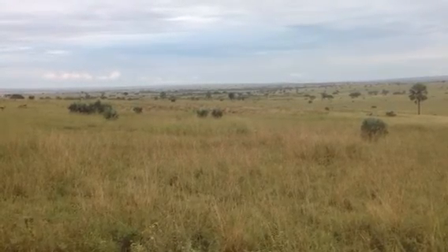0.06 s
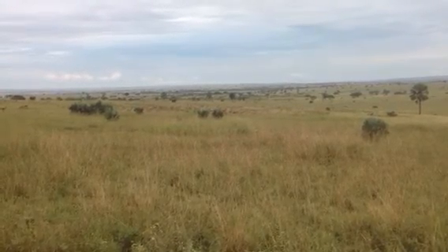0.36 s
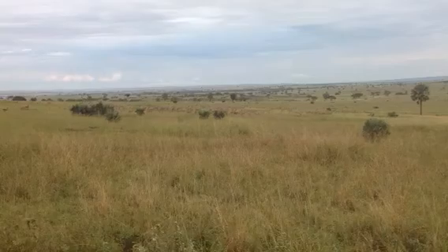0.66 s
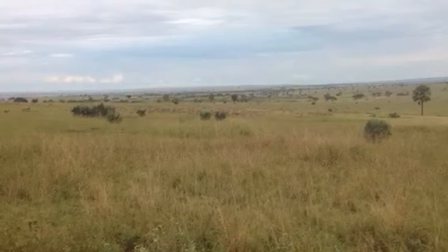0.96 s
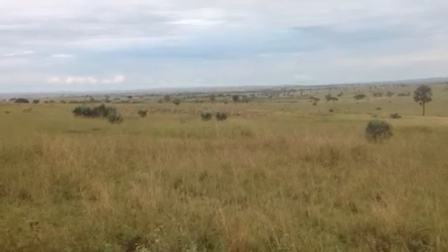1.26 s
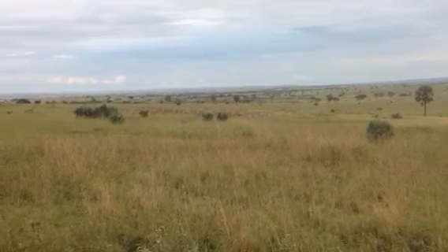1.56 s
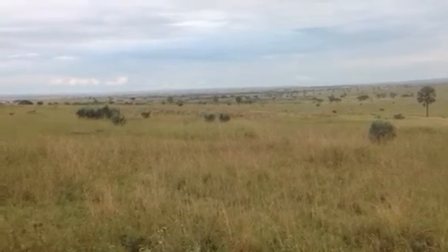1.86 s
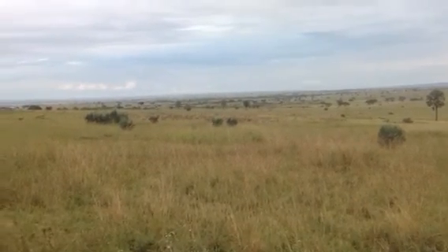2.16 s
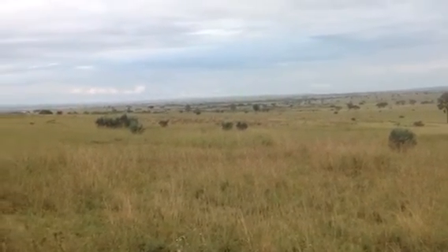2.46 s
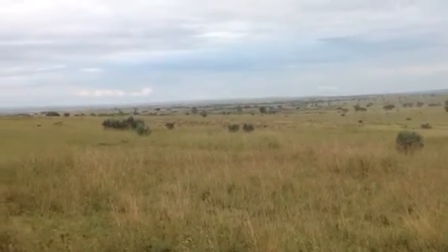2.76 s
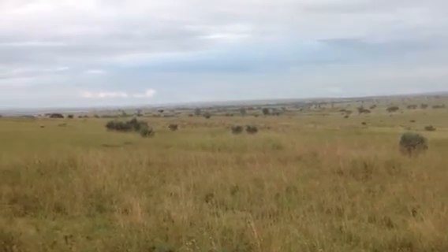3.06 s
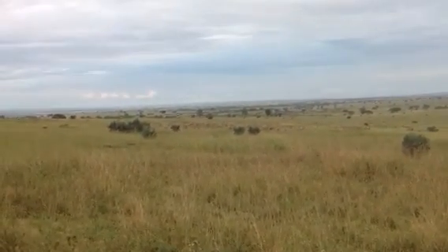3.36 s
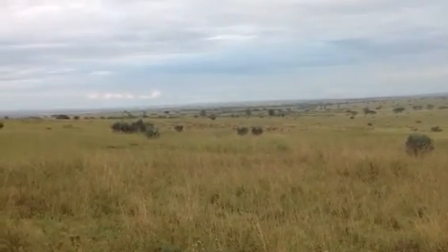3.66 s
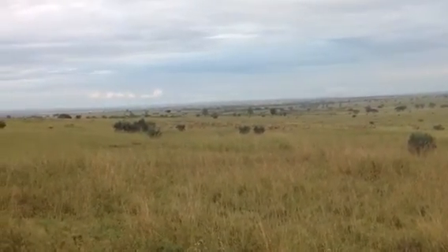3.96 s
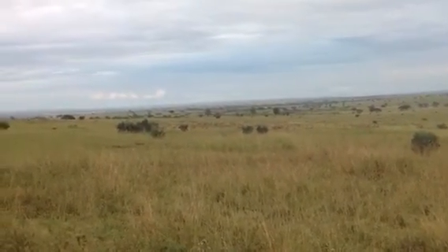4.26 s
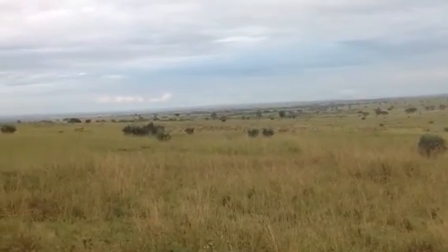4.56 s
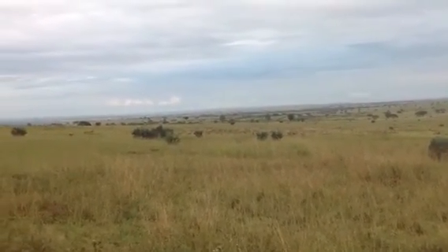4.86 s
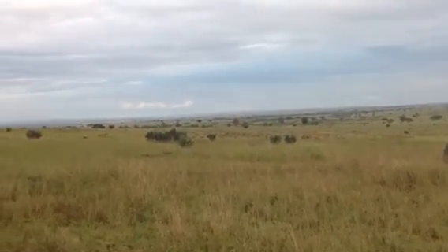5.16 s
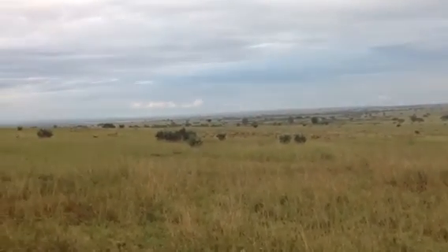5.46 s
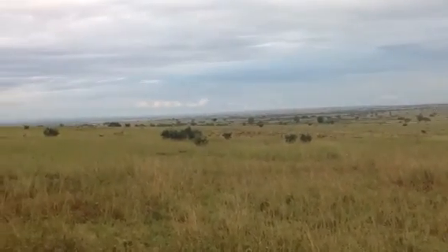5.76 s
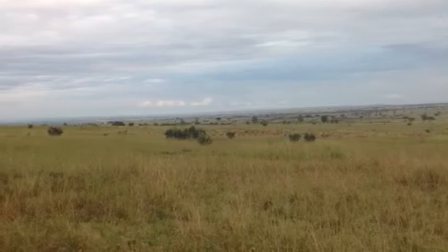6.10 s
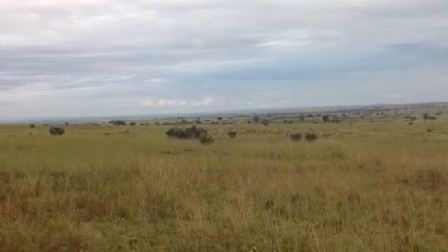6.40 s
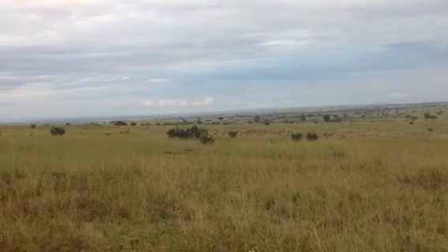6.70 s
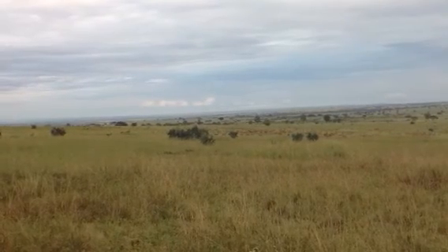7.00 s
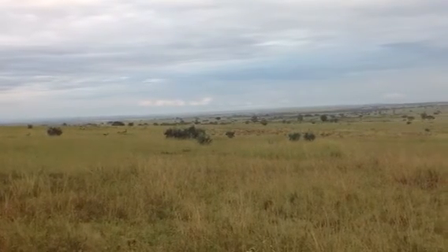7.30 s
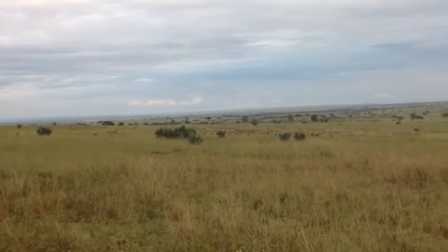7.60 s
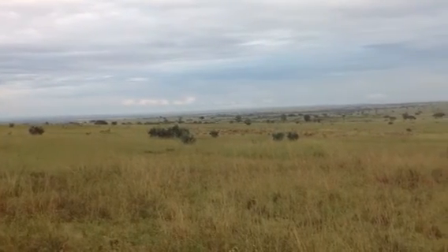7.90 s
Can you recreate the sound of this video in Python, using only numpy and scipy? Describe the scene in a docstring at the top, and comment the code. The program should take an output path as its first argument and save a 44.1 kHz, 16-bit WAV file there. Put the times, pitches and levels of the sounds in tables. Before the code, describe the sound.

Crickets chirp throughout in open grassland, with higher and lower ticks, trills and rasps over a soft, shimmering distant chorus. One close cricket stands out with a high chirr, pulsing about two and a half times a second: twice in the first second, then from about 2.2 to 4.7 seconds, and again from 6.4 to 7.7 seconds. A brief puff of wind bumps the hand-held microphone at the start, followed by two tiny bird peeps. A quick cluster of dry handling clicks and light knocks comes around 1.7 seconds. Gusts buffet the microphone from 2 to 2.8 seconds, with the hardest low thump at 2.5. Weaker puffs follow near 3.3 and 5 seconds. Far birds whistle very faintly between 3.6 and 7.4 seconds. From about 7.5 seconds the wind rumbles and thumps again until the end, just after 8 seconds.

```python
"""Crickets in open grassland

One cricket chirrs close by, a few farther off, with higher and lower kinds over a distant chorus.
Each chirp is a train of wing strokes, each stroke a short tone that falls as the scraper slows.
Far birds whistle, and gusts buffet and thump a hand-held camera's microphone.
There are a few dry clicks and dull knocks, some from handling the camera."""
import sys
import numpy as np
from scipy import signal
from scipy.fft import rfft, irfft, next_fast_len
from scipy.io import wavfile
from scipy.ndimage import uniform_filter1d, map_coordinates

SR = 44100
rng = np.random.default_rng(int(sys.argv[2]) if len(sys.argv) > 2 else 0)


def master_out(mix):
    """Clip the mix to full scale and print it as 16-bit PCM to the path in sys.argv[1]."""
    frames = np.transpose(np.atleast_2d(mix))
    ceiling = np.clip(frames, -1, 1)
    pcm = np.round(ceiling * 32767).astype(np.int16)
    wavfile.write(sys.argv[1], SR, pcm)


N = 358974
TIME = np.arange(N) / SR

# Spectra. Each row: frequency in Hz, relative level in dB.
AIR_SPECTRUM = [(20, -16), (50, -2.5), (80, -8.5), (160, 5), (300, 3), (600, -1), (1500, -3.5), (3300, -4),
                (9500, -6), (15000, -8)]  # the steady background
CHORUS_SPECTRUM = [(3000, -59), (3700, -16), (4150, -6), (4550, -14.5), (5100, -3), (5800, -0.5),
                   (6300, -1.5), (6850, -10), (7400, -6), (8100, -10), (8700, -15), (9500, -73)]  # many far insects merged
CLICK_SPECTRUM = [(300, -44), (900, -14), (1400, -7), (2200, -17), (3700, 3.5), (6000, -11), (9000, -7.5),
                  (15000, -18)]  # a sharp, dry click
KNOCK_SPECTRUM = [(200, -13), (550, 2), (1050, 1.5), (1370, 4), (1700, -2.5), (2300, 2.5), (3700, -4.5),
                  (6000, -30)]  # a dull knock
BUFFET_SPECTRUM = [(20, -16), (45, -8), (75, -5), (105, 1.5), (170, 1.5), (260, -8), (400, -26),
                   (600, -37.5), (1000, -62), (2500, -93)]  # coarse turbulence at the microphone
EDDY_SPECTRUM = [(120, -48), (260, -5), (400, 0), (550, -9.5), (750, -18), (1100, -35), (2500, -80)]  # fine turbulence of hard gusts
WING_RESONANCES = [(4800, 0), (5300, 2.5), (5620, 2), (5830, -7), (6070, 4), (6400, -2), (6900, 2),
                   (11000, 0)]  # the near cricket's wings

# Bird glides. Each row: start and length in seconds, first, middle and last pitch in Hz, level in dB.
BIRD_GLIDES = [(3.602, 0.3, 2250, 2300, 2400, -70.5), (3.831, 0.13, 2350, 2650, 2390, -62),
               (4.85, .09, 2800, 2830, 2950, -71), (5.087, .1, 2630, 2660, 3050, -69),
               (5.57, 0.34, 2720, 2206, 2316, -67.5), (6.08, .11, 2600, 2770, 3010, -65.5),
               (6.24, 0.14, 2950, 2780, 2600, -69.5), (6.52, .3, 2740, 2084, 1777, -65),
               (7.0, .16, 3620, 3450, 2900, -70.5), (7.118, 0.24, 1640, 1640, 1523, -70)]
# Bird notes that flick upward. Each row: start in seconds, held pitch in Hz, level in dB.
BIRD_FLICKS = [(4.215, 2480, -65), (4.338, 2430, -62.5), (4.462, 2410, -64.5), (4.592, 2480, -66)]
# Two clear, even peeps. Each row: start and length in seconds, pitch in Hz, level in dB.
BIRD_PEEPS = [(0.322, 0.036, 3970, -50), (0.383, 0.039, 3960, -50.5)]
# Dry clicks and dull knocks, some from handling the camera.
# Each row: start in seconds, click level in dB, knock level in dB.
DRY_CLICKS = [(1.628, -60, -57), (1.647, -41, -56.5), (1.656, -56, -72), (1.687, -43, -54),
              (1.716, -66, -62), (1.737, -46, -64), (1.743, -49.5, -62), (2.23, -53, -65),
              (2.951, -62, -61), (3.435, -55.5, -68), (4.744, -67, -51), (5.074, -65, -65)]

# The light breeze between gusts. Each row: time in seconds, level in dB.
BREEZE_LEVELS = [(0, -82.5), (2.3, -79), (3.2, -69.5), (3.55, -63), (4.3, -68.5), (5.05, -55.5),
                 (5.75, -73.5), (6.25, -76), (6.75, -61.5), (7.0, -71.5), (7.5, -61.5), (8.1, -50.5)]
# Gusts. Each row: arrival at full strength in seconds, hold in seconds, level in dB.
WIND_GUSTS = [(0.034, 0.11, -54.5), (1.178, .01, -61), (2.024, 0.015, -36), (2.491, 0.097, -33.5),
              (2.608, 0.095, -38.5), (2.72, 0.026, -43.5), (2.815, .015, -55), (3.314, 0.029, -53),
              (3.443, 0.12, -53.5), (3.681, 0.013, -48.5), (4.029, 0.079, -59.5), (4.529, 0.035, -54),
              (4.958, 0.1, -48.5), (5.359, 0.097, -56.5), (6.621, .03, -55), (6.75, 0.097, -60),
              (7.19, 0.054, -58), (7.399, 0.014, -47.5), (7.58, 0.081, -40), (7.712, 0.039, -38),
              (7.775, 0.056, -43), (7.872, 0.064, -34), (8.074, 0.039, -36)]
# Hard pushes of air on the microphone. Each row: time in seconds, level in dB.
HARD_PUSHES = [(.0409, -29.5), (.148, -39), (2.0262, -27), (2.329, -36.5), (2.4954, -15), (2.5316, -21),
               (2.7003, -23.5), (3.324, -37.5), (4.998, -33.5), (7.6266, -27), (7.7125, -25),
               (7.8875, -23.5), (7.9136, -18), (8.1049, -22.5)]

# Calls of three insects. Each row: last stroke in seconds, level in dB, number of strokes.
TICK_RUNS = [(.433, -57, 5), (1.12, -57, 1), (1.492, -57, 4), (2.029, -62.5, 3), (2.838, -56, 7),
             (3.866, -58, 6), (4.3, -62.5, 3), (4.899, -56.5, 6), (6.284, -57.5, 7), (7.636, -57, 7)]  # slow, low ticks
TRILL_SPELLS = [(.6, -60, 12), (2.0, -63, 19), (3.27, -60.5, 12), (4.7, -67, 17), (5.54, -59.5, 12),
                (6.83, -65, 14), (8.1, -68, 15)]  # an even, low trill
RASP_RUNS = [(1.52, -55, 3), (2.98, -52, 4), (3.37, -49.5, 2), (4.435, -55.5, 3), (5.68, -52.5, 4),
             (5.825, -51, 2), (5.945, -55, 2), (7.38, -53.5, 1), (7.892, -57, 2), (8.028, -52, 2)]  # a raspy, steeply falling call
# Short chirps of a small, high cricket. Each row: last stroke in seconds, number of strokes.
HIGH_CHIRPS = [(.141, 5), (.577, 3), (.899, 4), (1.272, 4), (1.631, 4), (1.986, 4), (2.572, 5), (3.119, 4),
               (3.449, 4), (3.776, 4), (4.148, 4), (4.542, 4), (5.035, 4), (5.518, 5), (5.916, 4),
               (6.248, 4), (6.621, 5), (7.104, 4), (7.775, 5)]
# Bouts of evenly spaced chirps. Each row: ends of the first and last chirp in seconds,
# number of chirps, first and last level in dB.
THIN_BOUTS = [(3.742, 5.522, 12, -63, -62), (5.668, 6.88, 9, -62.5, -61.5), (7.02, 7.65, 5, -67, -70)]  # a thin, very high cricket
NEIGHBOUR_BOUTS = [(.045, 5.24, 14, -50.5, -49.5), (1.09, 3.66, 8, -53.5, -58), (5.07, 7.89, 8, -66, -57),
                   (5.668, 8.12, 7, -51, -50.5)]  # the near cricket's neighbours
# Chirps of the near cricket. Each row: last stroke in seconds, level in dB.
NEAR_CHIRPS = [(.3646, -37.5), (.7491, -37.5), (2.3391, -39), (2.7234, -38.5), (3.1032, -37.5),
               (3.4994, -38), (3.8974, -38), (4.2962, -38.5), (4.7162, -39), (6.5322, -39.5),
               (6.916, -38.5), (7.2939, -38.5), (7.6892, -39)]


def amp(db):
    """Amplitude grows tenfold for every 20 dB."""
    return 10 ** (np.asarray(db) / 20)


def unit_rms(x):
    """Normalisation brings a signal to a mean power of 1."""
    return x / np.sqrt(np.mean(x ** 2) + 1e-20)


def wobble(knots_per_s):
    """Interpolation between random knots gives a smooth fluctuation."""
    return map_coordinates(rng.standard_normal(int(N * knots_per_s / SR) + 4), [TIME * knots_per_s])


def filtered(x, response):
    """A linear filter multiplies the spectrum by its frequency response."""
    size = next_fast_len(N + SR // 2)
    return irfft(rfft(x, size) * response(np.fft.rfftfreq(size, 1 / SR)), size)[:N]


def coloured(x, spectrum):
    """A filter imposes a spectrum, interpolated on a logarithmic frequency axis."""
    knots_hz, db = np.transpose(spectrum)
    return filtered(x, lambda hz: amp(np.interp(np.log(hz + 1), np.log(knots_hz + 1), db)))


def noise(spectrum):
    """White noise takes on the spectrum of its filter; the rms is set to 1."""
    return unit_rms(coloured(rng.standard_normal(N), spectrum))


def add(track, start_s, sound):
    """By superposition, a sound adds to the track from its start time."""
    first = int(round(start_s * SR))
    lo, hi = max(first, 0), min(first + len(sound), N)
    if hi > lo:
        track[lo:hi] += sound[lo - first:hi - first]


def scattered(x, wet_db, t60):
    """Scattering in the grass adds a short diffuse tail to the direct sound."""
    t = np.arange(SR // 4) / SR
    tails = rng.standard_normal((2, len(t))) * amp(-60 * t / t60)
    path_a, path_b = signal.fftconvolve(x[None], tails / np.linalg.norm(tails[0]), axes=1)[:, :N]
    sway = 2 * np.pi * 17 * TIME + wobble(20)  # the paths change as the grass moves
    return x + amp(wet_db) * np.std(x) * unit_rms(path_a * np.cos(sway) + path_b * np.sin(sway))


def wing_stroke(hz, fall_hz, stroke_s, rasp, overtone_db):
    """Pitch is the rate of tooth strikes: the scraper slows along the file, so the tone falls."""
    progress = np.arange(int(stroke_s * SR)) / (stroke_s * SR)
    uneven_catch = np.interp(progress, np.linspace(0, 1, 20), rng.standard_normal(20))
    pitch = hz + fall_hz * (.5 - progress) + rasp * hz * uneven_catch
    phase = 2 * np.pi * np.cumsum(pitch) / SR
    phase -= phase[len(phase) // 2]  # successive strokes are nearly alike
    return np.sin(np.pi * progress) * (np.sin(phase) + amp(overtone_db) * np.sin(2 * phase))


def stridulation(chirps, strokes_per_s, hz, fall_hz, stroke_s, rasp, settle_s, onset_db, overtone_db):
    """Repeated strokes form a chirp; force and pitch settle from their onset, then it stops dead."""
    out = np.zeros(N)
    for last_s, db, strokes in chirps:
        ages = np.arange(int(round(strokes))) / (strokes_per_s * (1 + .004 * rng.standard_normal()))
        chirp_hz = hz * (1 + .0037 * rng.standard_normal())
        for age, (size, detune, slip) in zip(ages, rng.standard_normal((len(ages), 3))):
            force_db = onset_db * max(1 - age / settle_s, 0)
            stroke_hz = chirp_hz * (1 + .003 * force_db + .003 * detune)  # softer is flatter
            tone = wing_stroke(stroke_hz, fall_hz, stroke_s, rasp, overtone_db)
            start_s = last_s - ages[-1] + age - stroke_s / 2 + .00002 * slip
            add(out, start_s, amp(db + force_db + .5 * size) * tone)
    return out


def bout_chirps(bouts, strokes):
    """Within a bout the chirps recur periodically while their level drifts linearly in dB."""
    return [(s, db, strokes) for first_s, last_s, count, first_db, last_db in bouts
            for s, db in np.linspace((first_s, first_db), (last_s, last_db), int(round(count)))]


def stray_chirps(db, strokes, count):
    """One chirp falls at random in each equal span of time, so no rhythm forms."""
    place, size = rng.random(count), rng.standard_normal(count)
    return [((k + place[k]) * N / SR / count, db + 2 * size[k], strokes) for k in range(count)]


def chorus():
    """Many far insects sum incoherently to a shimmer, from which a few stand out."""
    low = stridulation(stray_chirps(db=-62.5, strokes=3, count=36), strokes_per_s=15, hz=4093,
                       fall_hz=380, stroke_s=.018, rasp=.012, settle_s=.05, onset_db=2.5,
                       overtone_db=-32)
    middle = stridulation(stray_chirps(db=-59.5, strokes=3, count=40), strokes_per_s=21, hz=5140,
                          fall_hz=905, stroke_s=.017, rasp=.028, settle_s=.078, onset_db=-4,
                          overtone_db=-36)
    high = stridulation(stray_chirps(db=-58, strokes=5, count=30), strokes_per_s=62, hz=7290,
                        fall_hz=1090, stroke_s=.009, rasp=.0077, settle_s=.019, onset_db=-3,
                        overtone_db=-50)
    shimmer = noise(CHORUS_SPECTRUM) * amp(-60.5 + 1.7 * wobble(9) + 1.5 * wobble(150))
    return scattered(low + middle + high, wet_db=-13.5, t60=.069) + shimmer


def whistle(pitch):
    """A pure tone with soft ends, whose phase is the integral of its frequency."""
    return signal.windows.tukey(len(pitch), .5) * np.sin(2 * np.pi * np.cumsum(pitch) / SR)


def stray_glides(span_s, typical_hz, length_s, db, count):
    """Farther birds give faint glides of chance pitch and slope, in rows like BIRD_GLIDES."""
    notes = []
    for s in np.linspace(*span_s, count):
        late, detune, slope, arch = rng.standard_normal(4)
        contour_hz = typical_hz * np.exp(.12 * detune + .08 * np.array([-slope, arch / 2, slope]))
        notes.append((s + length_s * late, length_s, *contour_hz, db))
    return notes


def birds():
    """Moving air makes far whistles flutter and smear; two nearer peeps arrive directly."""
    far, peeps, waver = np.zeros(N), np.zeros(N), wobble(90)
    strays = stray_glides(span_s=(3.4, 8), typical_hz=2830, length_s=.15, db=-75, count=12)
    for s, length_s, first_hz, middle_hz, last_hz, db in list(BIRD_GLIDES) + strays:
        progress = np.linspace(0, 1, int(length_s * SR))
        glide_hz = np.polyval(np.polyfit([0, .5, 1], [first_hz, middle_hz, last_hz], 2), progress)
        waver_hz = 28 * np.interp(s + progress * length_s, TIME, waver)
        swell_db = -7 * (2 * progress - 1) ** 2
        add(far, s, amp(db + swell_db) * whistle(glide_hz + waver_hz))
    progress = np.linspace(0, 1, int(.1 * SR))
    for s, hz, db in BIRD_FLICKS:
        roughness = np.interp(progress, np.linspace(0, 1, 200), rng.standard_normal(200))
        rise = .89 * progress ** 5 * (1 + .45 * roughness)  # the voice roughens as it rises
        add(far, s, amp(db) * whistle(hz * (1 + rise)))
    for s, length_s, hz, db in BIRD_PEEPS:
        add(peeps, s, amp(db) * whistle(np.full(int(length_s * SR), hz)))
    flutter = amp(2 * wobble(40) - 1.5)
    return peeps + scattered(far * flutter, wet_db=-6, t60=.3)


def dry_clicks():
    """Each transient is a sharp click, a dull knock and a short ring, all decaying exponentially."""
    click, knock, ring = np.zeros((3, N))
    t = np.arange(SR // 5) / SR
    for s, click_db, knock_db in DRY_CLICKS:
        # the weaker, slower decays leave a brief rustle
        add(click, s, amp(click_db) * (amp(-60 * t / .023) + amp(-18.5 - 60 * t / .24)))
        add(knock, s, amp(knock_db) * (amp(-60 * t / .043) + amp(-18 - 60 * t / .43)))
        ring_hz = 1367 * (1 + .02 * rng.standard_normal())
        add(ring, s, amp(knock_db - 6 - 60 * t / .11) * np.sin(2 * np.pi * ring_hz * t))
    return click * noise(CLICK_SPECTRUM) + knock * noise(KNOCK_SPECTRUM) + ring


def wind_level_db(rise_db_per_s, fall_db_per_s):
    """Powers add: each gust builds, holds and dies away above the breeze."""
    power = amp(np.interp(TIME, *np.transpose(BREEZE_LEVELS)) + 3.3 * wobble(18)) ** 2
    for s, hold_s, db in WIND_GUSTS:
        before_s, after_s = np.maximum(s - TIME, 0), np.maximum(TIME - s - hold_s, 0)
        power += amp(db - rise_db_per_s * before_s - fall_db_per_s * after_s) ** 2
    return 10 * np.log10(power)


def thumps(pushes):
    """A pressure pulse pulls the diaphragm in and lets it swing back, the harder the sharper."""
    out, t = np.zeros(N), np.arange(-SR // 50, SR // 50) / SR
    for s, db in pushes:
        hz = max(190 * amp(.24 * (db + 28)), 140)
        swing = np.cos(2 * np.pi * hz * t) / (1 + (1.38 * hz * t) ** 2) ** 3
        add(out, s + t[0], -amp(db) * swing)
    return out


def wind(eddies_per_s=75):
    """Turbulence rumbles at the microphone port, eddies patter on it, and hard pushes thump."""
    wind_db = wind_level_db(rise_db_per_s=897, fall_db_per_s=900) + 1.2 * wobble(50)
    coarse = noise(BUFFET_SPECTRUM)
    running_rms = np.sqrt(np.abs(uniform_filter1d(coarse ** 2, size=1300)) + 1e-6)
    coarse /= running_rms  # the wind level alone sets its strength
    fine = noise(EDDY_SPECTRUM) * amp(-17 + .92 * (wind_db + 36))  # grows faster with wind speed
    rumble = amp(wind_db - 1) * (coarse + fine)
    late, size = rng.standard_normal((int(eddies_per_s * N / SR), 2)).T
    eddy_s = (np.arange(len(late)) + .256 * late) / eddies_per_s
    eddy_db = np.interp(eddy_s, TIME, wind_db) + 1.5 + 2.5 * size
    pressure = rumble + thumps(zip(eddy_s, eddy_db)) + thumps(HARD_PUSHES)
    # the microphone rejects slow pressure changes
    return filtered(pressure, lambda hz: 1 - 1 / (1 + (hz / 84) ** 6))


def other_insects():
    """Five more kinds stridulate, each with its own pitch and stroke rate."""
    fading_chirps = [(s, -48 - .36 * s, strokes) for s, strokes in HIGH_CHIRPS]
    high = stridulation(fading_chirps, strokes_per_s=60.3, hz=7266, fall_hz=248,
                        stroke_s=.0095, rasp=.0032, settle_s=.016, onset_db=-1, overtone_db=-47)
    thin = stridulation(bout_chirps(THIN_BOUTS, strokes=4), strokes_per_s=52, hz=8516, fall_hz=261,
                        stroke_s=.019, rasp=.006, settle_s=.022, onset_db=-.5, overtone_db=-50)
    ticks = stridulation(TICK_RUNS, strokes_per_s=9.13, hz=3923, fall_hz=383,
                         stroke_s=.021, rasp=.019, settle_s=.1, onset_db=0, overtone_db=-42)
    trill = stridulation(TRILL_SPELLS, strokes_per_s=18.7, hz=4176, fall_hz=192,
                         stroke_s=.028, rasp=.006, settle_s=.17, onset_db=-3.5, overtone_db=-30)
    rasps = stridulation(RASP_RUNS, strokes_per_s=20, hz=5180, fall_hz=805,
                         stroke_s=.021, rasp=.032, settle_s=.037, onset_db=-.5, overtone_db=-33)
    return scattered(high + thin + ticks + trill + rasps, wet_db=-17.5, t60=.13)


def neighbour_crickets():
    """With distance, chirps arrive fainter and with a larger share of scattered sound."""
    chirps = bout_chirps(NEIGHBOUR_BOUTS, strokes=19)
    chirr = stridulation(chirps, strokes_per_s=110, hz=5807, fall_hz=1240,
                         stroke_s=.008, rasp=.016, settle_s=.03, onset_db=-5.5, overtone_db=-24.5)
    return scattered(chirr, wet_db=-10, t60=.03)


def near_cricket():
    """Each falling stroke sweeps through the wing resonances, which colour the loud chirr."""
    chirps = [(s, db, 19) for s, db in NEAR_CHIRPS]  # 19 strokes each
    chirr = stridulation(chirps, strokes_per_s=106.5, hz=5914, fall_hz=1180,
                         stroke_s=.008, rasp=.016, settle_s=.047, onset_db=-10.5, overtone_db=-29)
    return scattered(coloured(chirr, WING_RESONANCES), wet_db=-17, t60=.03)


def scene():
    """The pressures of all sources superpose at one microphone."""
    air = amp(-64) * noise(AIR_SPECTRUM)
    background = air + chorus() + birds() + dry_clicks() + wind()
    return (background + other_insects() + neighbour_crickets() + near_cricket())[None]


def record(dry):
    """The camera is a low-pass system: it keeps nothing above its band limit."""
    return np.array([filtered(x, lambda hz: hz < 15350) for x in dry])


dry = scene()
out = record(dry)
master_out(out)
```